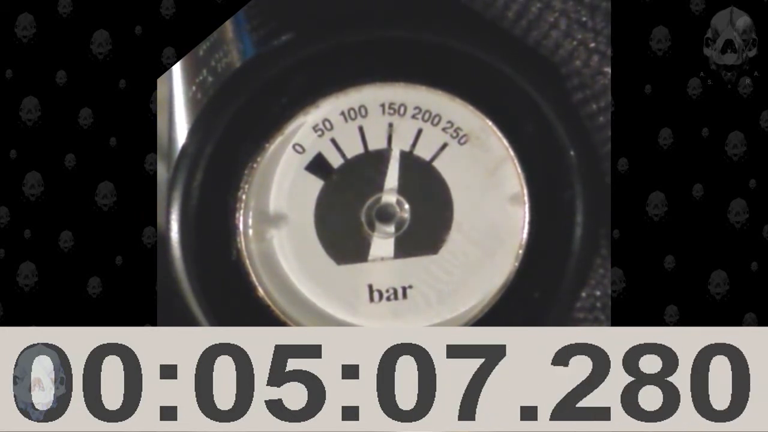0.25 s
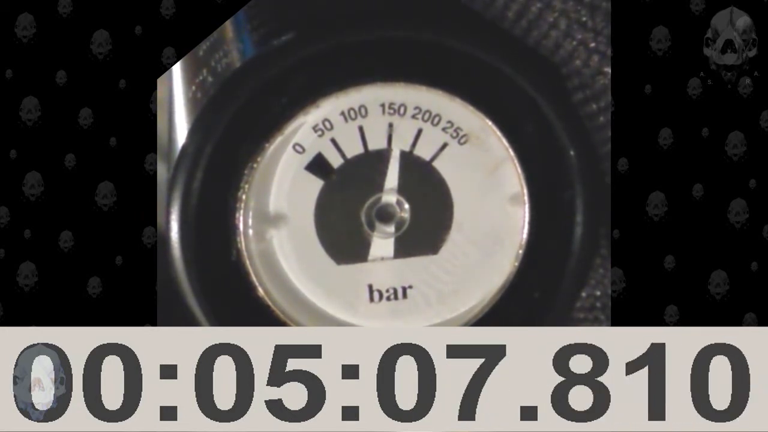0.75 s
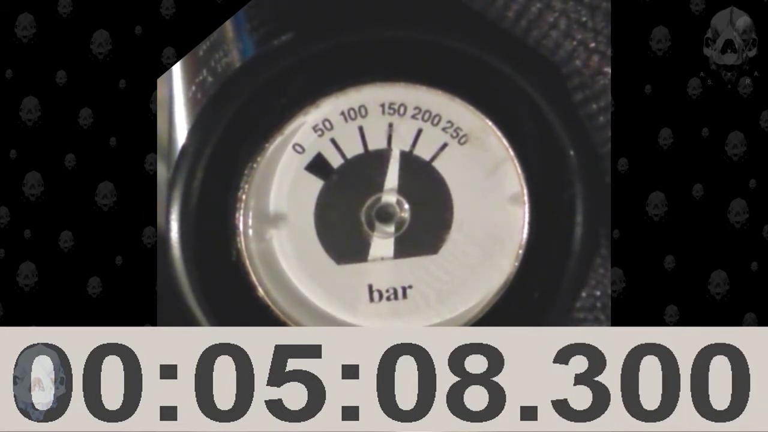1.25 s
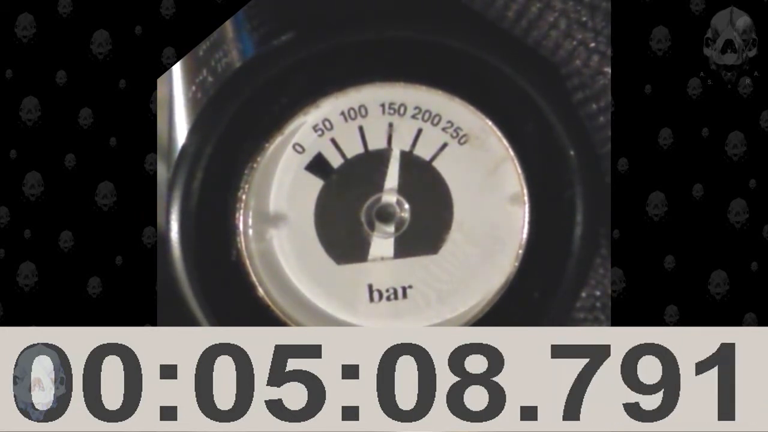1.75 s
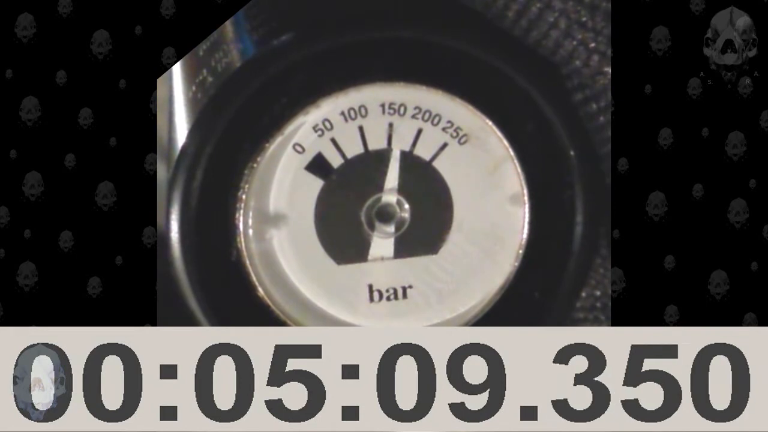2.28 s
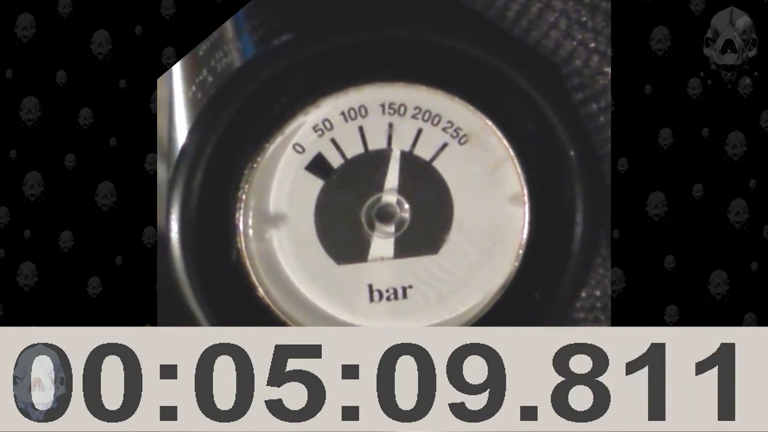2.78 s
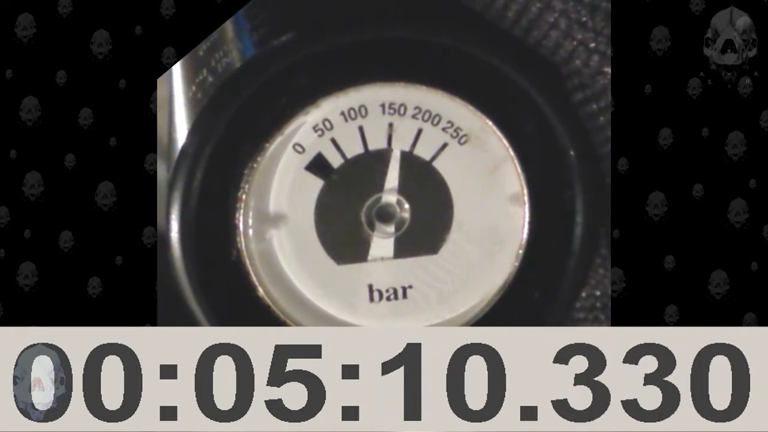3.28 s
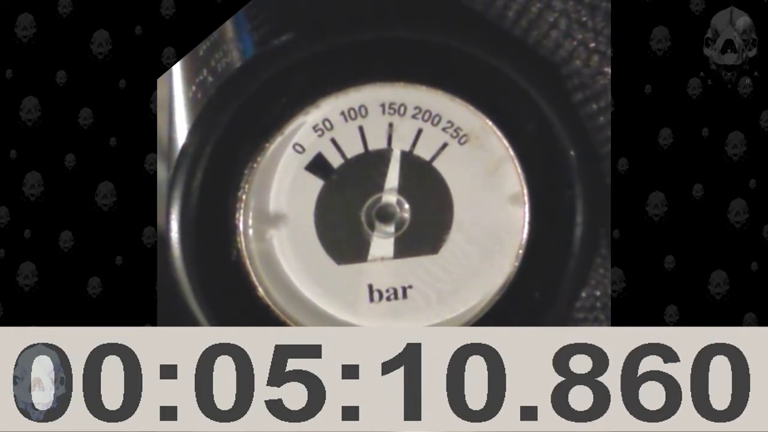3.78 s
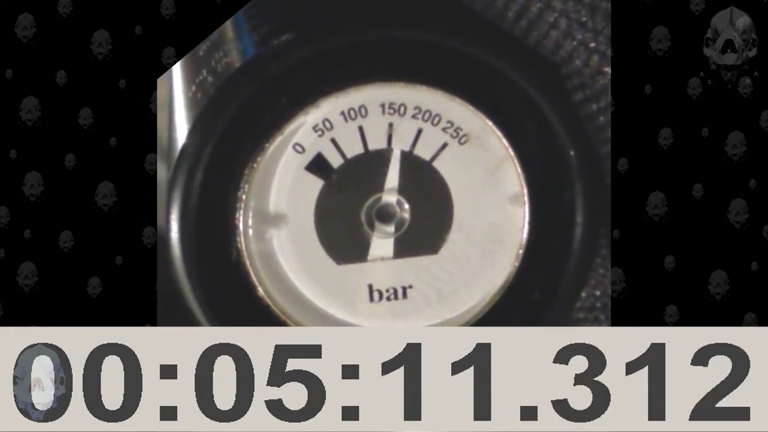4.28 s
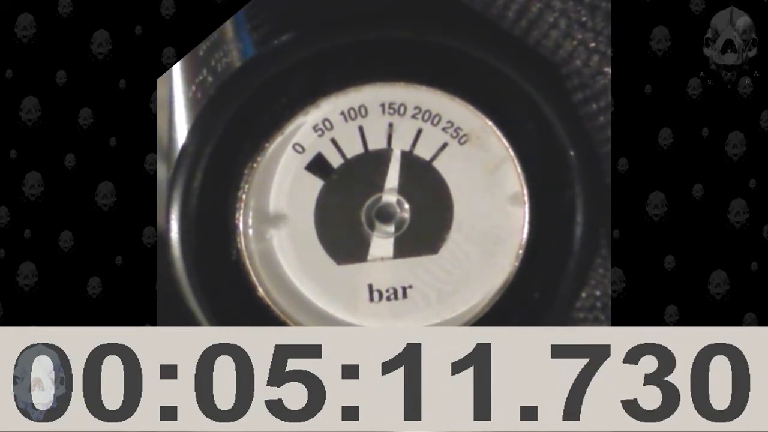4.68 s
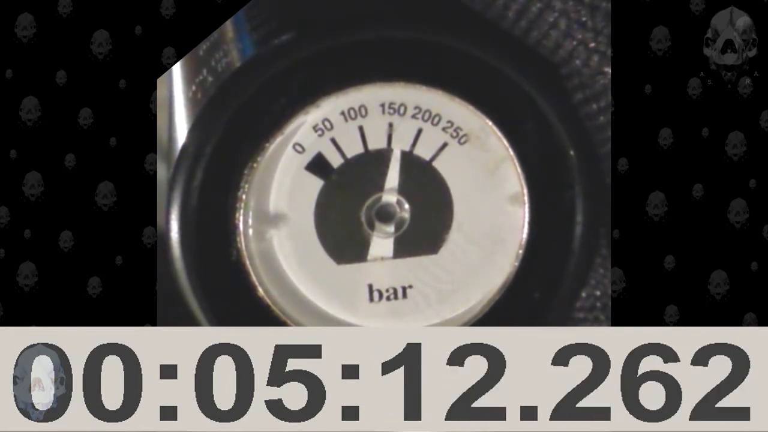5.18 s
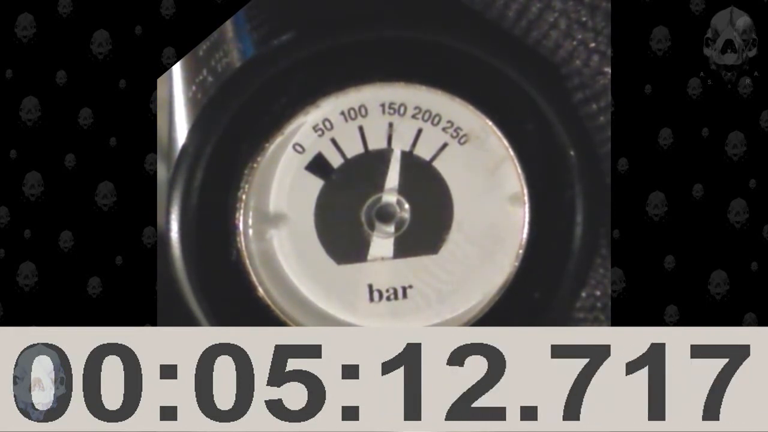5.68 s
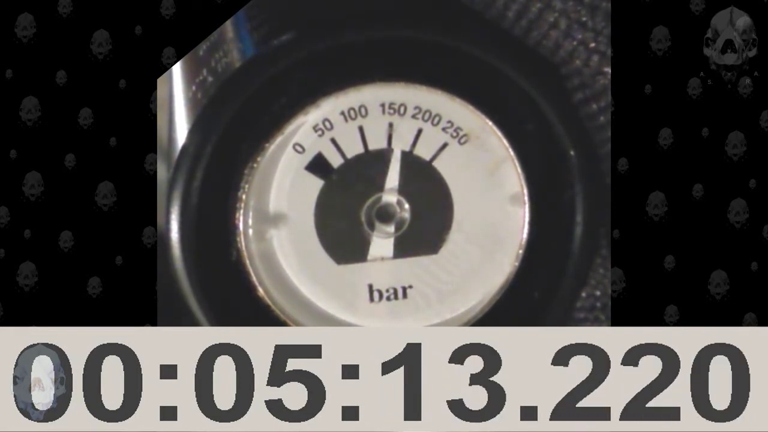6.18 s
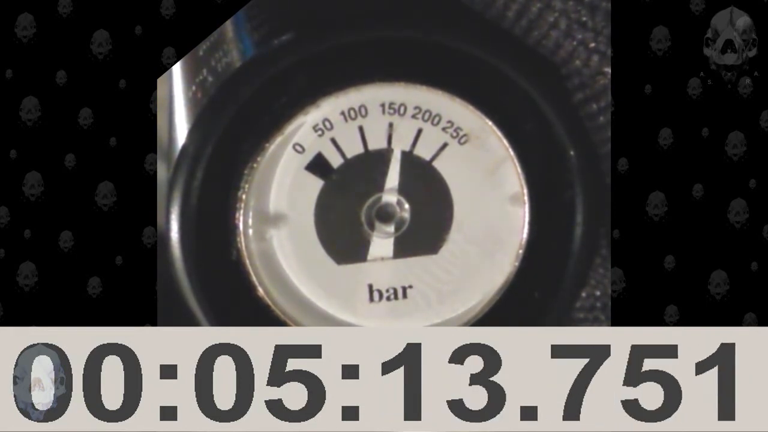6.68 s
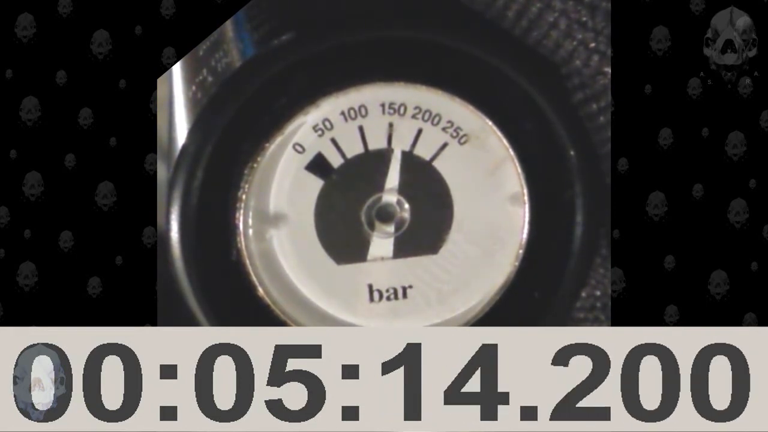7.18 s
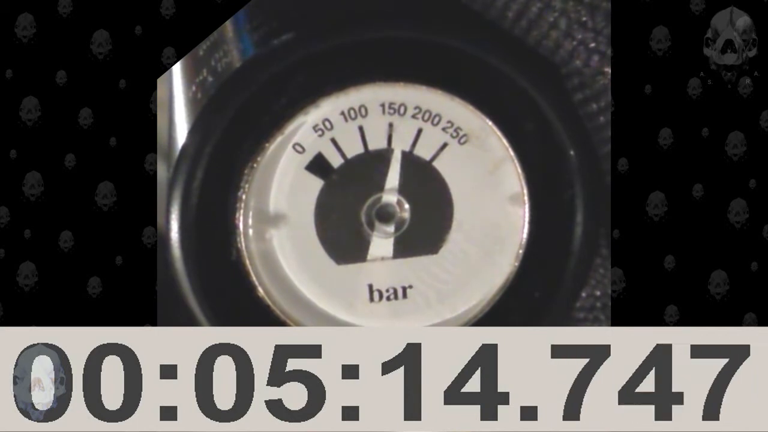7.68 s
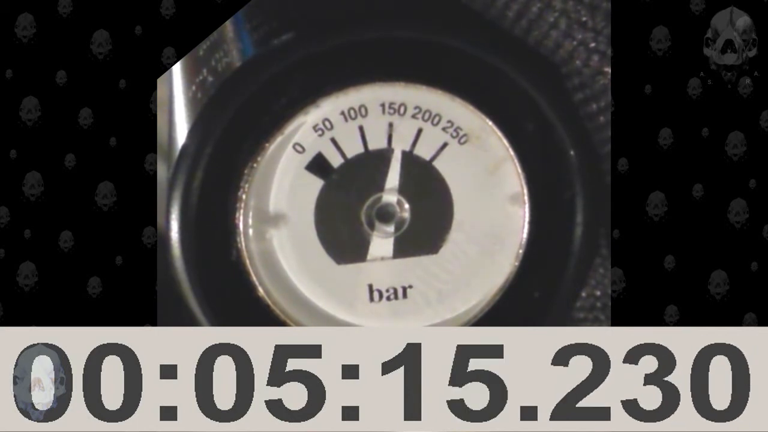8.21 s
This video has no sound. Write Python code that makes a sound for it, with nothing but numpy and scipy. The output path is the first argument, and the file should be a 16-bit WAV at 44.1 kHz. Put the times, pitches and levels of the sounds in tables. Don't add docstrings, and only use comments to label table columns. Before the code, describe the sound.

A small high-pressure piston compressor runs steadily indoors, close to a stereo microphone. Its geared motor drones low and throbs several times per crank turn, with a rattling metal casing and a constant fan and leak hiss. Nearly twice a second, a short air puff and dull thud mark the stroke, often near a bright steel valve click. A loose panel buzzes briefly now and then.

```python
import sys
import numpy as np
from scipy import signal
from scipy.fft import rfft, irfft, next_fast_len
from scipy.io import wavfile
from scipy.ndimage import map_coordinates

SR = 44100
rng = np.random.default_rng(int(sys.argv[2]) if len(sys.argv) > 2 else 0)


def field_ratio(decibels):
    return 10 ** (np.asarray(decibels, dtype=float) / 20)


def generate_wav(signal):
    frames = np.transpose(np.atleast_2d(signal))
    scaled = np.clip(frames, -1, 1) * 32767
    pcm = np.round(scaled).astype(np.int16)
    wavfile.write(sys.argv[1], SR, pcm)


N = 372644
T = np.arange(N) / SR
CRANK_HZ = 1.7437
ANGLE = T * CRANK_HZ % 1

# short_throb_db, long_throb_db, after_throb_db, turnover_throb_db, puff_db
STROKES = [(-0.5, 0.5, 1.5, 2, -25), (-2, -2, -7, 0, -25), (-1.5, 0.5, -5, -9, -25.5),
           (-0.5, 1, -2, 7.5, -24.5), (-1, 1.5, -3, -1, -25), (0.5, 0.5, -3.5, 5.5, -24.5),
           (0, -1, -6, 4.5, -25), (-1.5, 2, -0.5, 0, -25.5), (0.5, 1, -2.5, 6, -23),
           (-1.5, 0.5, 2.5, -8, -26), (-3.5, -1, -1.5, -4.5, -29), (-3, 1.5, 4, -6, -24.5),
           (-0.5, -5, 0, -2, -26.5), (-1.5, 1, -1, -4, -23.5), (-2, 2.5, -1, 4, -24)]


def unit(x):
    return x / np.sqrt(np.mean(x ** 2) + 1e-20)


def along(points, hz):
    f, v = np.transpose(points)
    return np.interp(np.log(hz + 1), np.log(f + 1), v)


def wobble(rate):
    coarse = T[::32]
    knots = rng.standard_normal(2000)
    return np.interp(T, coarse, map_coordinates(knots, [coarse * min(rate, 200)]))


def from_angle(centre):
    return (ANGLE - centre + .5) % 1 - .5


def swell(centre, rise, fall):
    d = from_angle(centre)
    return np.exp(-(d / np.where(d < 0, rise, fall)) ** 2)


def per_turn(values, centre):
    turn = np.round(T * CRANK_HZ - centre).astype(int)
    return np.asarray(values)[np.clip(turn, 0, len(values) - 1)]


def throbs(swells, rest_db, more_db=()):
    gain = field_ratio(rest_db)
    for centre, rise, fall, db in swells[len(more_db):]:
        gain = gain + field_ratio(db) * swell(centre, rise, fall)
    for (centre, rise, fall, db), more in zip(swells, more_db):
        gain = gain + field_ratio(db + per_turn(more, centre)) * swell(centre, rise, fall)
    return gain


def filtered(x, response):
    m = next_fast_len(N + 8192)
    return irfft(rfft(x, m) * response(np.fft.rfftfreq(m, 1 / SR)), m)[..., :N]


def spread(pair):
    # frequency_hz, likeness (0-1)
    alike = [(60, .98), (125, .8), (200, .99), (420, .95), (520, .8), (630, .9), (740, .45), (840, .88),
             (1020, .4), (1250, .72), (1800, .5), (2400, .4), (2930, .8), (4000, .4), (15000, .35)]

    def mid_and_side(hz):
        half_angle = np.arccos(np.clip(along(alike, hz), -1, 1)) / 2
        return np.array([np.cos(half_angle), np.sin(half_angle)])

    mid, side = filtered(pair, mid_and_side)
    return np.array([mid + side, mid - side])


def rush(spectrum, modes, grain_db, repeats=((100, 0),)):
    fresh, once = rng.standard_normal((2, 2, N)) * field_ratio(grain_db * wobble(150))
    again = once[:, (ANGLE * SR / CRANK_HZ).astype(int)]
    noise = filtered(fresh, lambda f: np.sqrt(1 - along(repeats, f)))
    noise += filtered(again, lambda f: np.sqrt(along(repeats, f)))

    def resonant(f):
        power = 1 + sum(field_ratio(db) ** 2 / (1 + (2 * (f - c) / w) ** 2) for c, w, db in modes)
        return field_ratio(along(spectrum, f)) * np.sqrt(power)

    return unit(spread(filtered(noise, resonant)))


def tones(lines, bend, flutter_db):
    pair = np.zeros((2, N))
    for hz, db, blur_hz in lines:
        for port, stray_hz in zip(pair, (0, 6)):
            slip = np.cumsum(hz * bend + (blur_hz + stray_hz) * wobble(25)) / SR
            phase = 2 * np.pi * (hz * T + slip + rng.random())
            port += field_ratio(db + flutter_db * wobble(30)) * np.sin(phase)
    return unit(spread(pair))


def geared(lines):
    return [(round(hz / CRANK_HZ) * CRANK_HZ, db, blur_hz) for hz, db, blur_hz in lines]


def tooth_blows():
    teeth = 17
    tooth = teeth * ANGLE - .4
    uneven = np.interp(tooth, np.arange(teeth), rng.standard_normal(teeth), period=teeth)
    return np.cos(2 * np.pi * tooth) + 1.5 * uneven


def tooth_drone():
    # frequency_hz, level_db, blur_hz
    thump_lines = [(64.52, 0, .02), (161, -9.5, 0.1)]
    drone_lines = [(221.45, 0, 0.1), (230.17, -17, 0.1)]
    # angle_turns, rise_turns, fall_turns, level_db
    thump_swells = [(.06, 0.082, .1, -35.5), (.25, .08, .15, -44), (.66, 0.19, 0.19, -38)]
    drone_swells = [(0.175, 0.038, 0.027, -15), (0.593, 0.069, 0.068, -15.5), (0.752, 0.061, 0.07, -21),
                    (0.02, 0.051, 0.046, -24), (0.508, 0.01, 0.029, -19), (0.3, 0.072, 0.095, -25)]
    mesh_swells = [(0.29, 0.18, 0.15, -30.5), (0.707, 0.082, 0.036, -25.5), (0.786, 0.052, 0.094, -36.5),
                   (0.5, .03, 0.047, -39)]
    *more_drone_db, _ = np.transpose(STROKES)
    drone = throbs(drone_swells, -34, more_drone_db)
    bend = 0.0048 * drone / drone.max() + 0.057 * swell(0.98, 0.047, 0.047)
    low = throbs(thump_swells, -48.5) * tones(thump_lines, 0, flutter_db=1.6)
    low += drone * tones(drone_lines, bend - bend.mean(), flutter_db=1.8)
    low += throbs(mesh_swells, -54.5) * tones([(189.3, 0, 0.1)], 0, flutter_db=-0.5)
    return low


def cover(gear_load, tooth_db):
    # frequency_hz, level_db, blur_hz
    lower_lines = [(782, -0.73, 4.6), (806.6, -0.19, 3.74)]
    upper_lines = [(835, -3.5, 3.82), (866, -6, 5.06), (1009, -14.5, 10.5)]
    climb_db = 5 * (swell(0.79, 0.12, 0.03) + swell(.3, .1, .05)
                    - swell(0.53, 0.06, 0.07) - .6 * swell(.05, .1, .08))
    arch = .012 * (swell(0.811, .25, 0.0415) + swell(0.268, 0.1178, 0.0503))
    gain = field_ratio(-31 + 0.75 * tooth_db) * (gear_load / field_ratio(-20.5)) ** 0.077
    lower = gain * field_ratio(-climb_db) * tones(lower_lines, arch, flutter_db=2.0)
    return lower + gain * field_ratio(climb_db) * tones(upper_lines, arch, flutter_db=2.0)


def slack_knock():
    # frequency_hz, level_db (per Hz)
    knock_spectrum = [(350, -34), (520, -3), (650, 1), (900, -9), (1400, -30), (3000, -80)]
    knock = rush(knock_spectrum, [], grain_db=-1.5, repeats=[(100, 0.36)])
    return field_ratio(-20.5) * swell(0.271, .008, 0.018) * knock


def casing_rattle(tooth_db):
    # frequency_hz, level_db (per Hz)
    rattle_spectrum = [(35, -32), (60, -29), (147, -21), (226, -5), (303, -15), (382, -15.5), (467, -12.5),
                       (537, -18), (627, -6.5), (720, -10.5), (815, -7), (965, -20.5), (1160, -14.5),
                       (1710, -22.5), (2400, -25.5), (3120, -52), (5280, -120)]
    # frequency_hz, width_hz, level_db (over the noise)
    casing_modes = [(1156, 71, 8.5), (1464, 12.5, 8.5), (1280, 130, 2)]
    # frequency_hz, share (0-1)
    rattle_repeats = [(150, .7), (350, .55), (500, .3), (750, .1), (1300, .08), (1800, 0)]
    # angle_turns, rise_turns, fall_turns, level_db
    rattle_swells = [(.2, 0.083, 0.14, -31.5), (.55, 0.064, 0.06, -30), (.7, 0.086, 0.1, -29),
                     (.95, .1, 0.11, -31)]
    load = (throbs(rattle_swells, -30) / field_ratio(-28.5)) ** 1.25
    gain = load * field_ratio(-27.0 + tooth_db + 0.58 * wobble(18))
    return gain * rush(rattle_spectrum, casing_modes, grain_db=1.5, repeats=rattle_repeats)


def gears():
    # frequency_hz, level_db, blur_hz
    gear_lines = [(248.2, 0.5, 0.56), (285.4, -6, 0.61), (318.5, -19, 0.47), (343, -6, 0.33),
                  (438.4, -9, 1.1), (471, -5, 1.35), (608, -9, 3.1), (621.5, -5.5, 2.8),
                  (647.5, -9.5, 3.88), (722, -7.5, 7.8)]
    # angle_turns, rise_turns, fall_turns, level_db
    gear_swells = [(.22, 0.069, 0.11, -24.5), (.6, 0.1, 0.14, -24.5), (.8, 0.078, 0.079, -24),
                   (.97, 0.04, 0.049, -26.5)]
    gear_load = throbs(gear_swells, -35.5)
    tooth_db = tooth_blows()
    high = field_ratio(-30.5) * (gear_load / field_ratio(-25.5)) ** 1.1 * tones(geared(gear_lines), 0, flutter_db=1.85)
    high += cover(gear_load, tooth_db) + slack_knock() + casing_rattle(tooth_db)
    return tooth_drone() + field_ratio(.45 * wobble(10)) * high


def motor():
    # angle_turns, rise_turns, fall_turns, level_db
    hum_swells = [(.08, .08, 0.054, -38), (.27, 0.08, 0.089, -36), (.6, .1, .2, -52.5)]
    sag = 0.031 * swell(0.21, 0.22, .15)
    return throbs(hum_swells, -44.5) * tones([(120, 0, 0.2)], sag.mean() - sag, flutter_db=1.7)


def air():
    # frequency_hz, level_db (per Hz)
    hiss_spectrum = [(940, -15), (1600, -4.5), (1690, -14), (1830, -4.5), (2170, -14), (2680, -3.5),
                     (2930, -3.5), (4010, -15.5), (6000, -20.5), (7000, -25.5), (9240, -20.5), (9980, -20),
                     (15100, -31.5), (15800, -31)]
    # frequency_hz, width_hz, level_db (over the noise)
    head_modes = [(2490, 31, 2.6), (2890, 49, 5.1), (3500, 20, 2.6), (3696, 63, 2.6), (3254, 120, 1.7),
                  (8470, 230, 5.7), (9040, 74, 13), (9340, 68, 3.3)]
    load = swell(0.22, 0.12, 0.18) + swell(0.64, 0.16, 0.32) + swell(0.96, 0.088, 0.028)
    hiss = rush(hiss_spectrum, head_modes, grain_db=1.0)
    fizz = filtered(hiss, lambda f: 1 / (1 + (3900 / (f + 1)) ** 8))
    fizz_db = 1.07 + 0.48 * wobble(8) + 3.14 * load + 0.59 * wobble(30) + 0.27 * wobble(70)
    hiss = field_ratio(-29.5 + 2.4 * load + 0.93 * wobble(14)) * (hiss - fizz) + field_ratio(-33.0 + fizz_db) * fizz
    sing_db = -43 + 15 * swell(0.98, 0.11, 0.07) + 2.5 * wobble(6.5)
    sing = field_ratio(sing_db) * tones([(2935, 0, 8)], 0, flutter_db=1.5)
    reed_spectrum = [(12000, -40), (13800, -8), (14600, 0), (15600, -6), (17000, -40)]
    reed = field_ratio(-51) * swell(0.59, .04, .06) * rush(reed_spectrum, [], grain_db=0.0)
    return hiss + sing + reed


def bearings():
    # angle_turns, length_turns, level_db, pitch_hz
    jolts = [
        (.088, .03, -28, 78),
        (.215, .016, -23, 282),
    ]
    shudder = field_ratio(-41) * (.3 + swell(.6, .1, .14)) * tones([(90.67, 0, .05)], 0, flutter_db=.8)
    out = shudder
    for centre, length, db, hz in jolts:
        ring = np.cos(2 * np.pi * hz * from_angle(centre) / CRANK_HZ)
        out = out + field_ratio(db + 0.9 * wobble(2.83)) * swell(centre, length, length) * ring
    return out


def valve_clicks():
    # start_s, peak_db, low_part_db
    click_events = [(0.543, -31, -6), (1.063, -30, -6), (1.692, -20.5, 2), (2.2308, -24, -4),
                    (2.501, -25.5, 9), (2.7861, -25, -6), (2.838, -19, 0.5), (3.074, -29, -6),
                    (3.3777, -31, -6), (3.952, -23, -6), (4.5037, -37, -6), (4.56, -16, -9),
                    (5.0779, -48.5, -6), (5.0983, -26, -6), (5.133, -28, -6), (5.3667, -27, -6),
                    (5.7049, -30, -6), (5.941, -27, 1), (6.5145, -26, 9), (7.3935, -25, -6),
                    (7.9992, -24, -4)]
    bright, dull = np.zeros((2, 2, N + SR))
    t = np.arange(2000) / SR
    decay = field_ratio(-60 * t / 0.022) + 0.36 * field_ratio(-60 * t / 0.044)
    for start_s, db, low_db in click_events:
        burst = decay * rng.standard_normal((2, len(t)))
        span = slice(round(start_s * SR), round(start_s * SR) + len(t))
        bright[:, span] += field_ratio(db - 2) * burst
        dull[:, span] += field_ratio(db + low_db) * burst
    steel = [(2500, -30), (4500, 8), (7000, -7.0), (9500, 8), (12000, -7), (16000, -14)]
    body = [(300, -42), (1000, 4), (3000, 7), (5000, -40)]
    clicks = filtered(bright[:, :N], lambda f: field_ratio(along(steel, f)))
    return clicks + filtered(dull[:, :N], lambda f: field_ratio(along(body, f)))


def valve():
    # frequency_hz, level_db (per Hz)
    puff_spectrum = [(900, -33), (1300, 1), (1500, 3), (2000, 9), (3000, -7), (5000, -9), (9000, -40),
                     (16000, -48)]
    puff_gain = field_ratio(per_turn(np.transpose(STROKES)[-1], .93)) * swell(0.943, .09, 0.086)
    puff = puff_gain * rush(puff_spectrum, [(1428, 180, 10.7)], grain_db=4.0)
    since = (ANGLE - .9) % 1 / CRANK_HZ
    thud_phase = 2 * np.pi * (240 * since - 2.4 * np.exp(-since / 0.022))
    thud = field_ratio(-17) * swell(.925, .014, 0.035) * np.sin(thud_phase)
    return puff + thud + valve_clicks()


def panel():
    # centre_s, level_db, pitch_hz
    buzzes = [
        (2.4, -25, 290),
        (3.791, -22, 310),
        (6.68, -24, 291),
        (7.211, -19.5, 285),
    ]
    out = 0
    for centre_s, db, hz in buzzes:
        envelope = np.exp(-((T - centre_s) / 0.033) ** 2)
        out = out + field_ratio(db) * envelope * tones([(hz, 0, 9)], 0, flutter_db=6.5)
    return out


def scene():
    return gears() + motor() + air() + bearings() + valve() + panel()


def roll_off(x):
    return signal.sosfilt(signal.butter(12, 16550, fs=SR, output="sos"), x)


def record(dry):
    # frequency_hz, level_db
    lean = [(60, -1.2), (110, 0), (200, -1.6), (380, -2.5), (700, -1.5), (1290, -5), (2380, 2.5),
            (4400, -1), (8120, 1.7), (15000, 0)]
    # frequency_hz, lead_rad
    port_lead = [(60, .2), (125, -.4), (200, .2), (560, .3), (900, 1.2), (1080, 1.5), (1300, -.6),
                 (1470, 0), (1720, -2.4), (2050, -2.9), (2430, -6.5), (2690, -8.5), (2930, -6.9),
                 (3200, -6.3)]
    steps = rng.standard_normal((3, 200))
    knots_hz = 3200 + 70 * np.arange(200)
    scramble = .9 * (np.cumsum(steps[0]) - steps[0, 0])

    def port_response(f):
        lead = along(port_lead, f) + np.interp(f, knots_hz, scramble)
        ripple_db = 1.8 * np.array([np.interp(f, knots_hz, r, left=0) for r in steps[1:]])
        band = (f < 15830) / np.sqrt(1 + (50 / (f + 1)) ** 7)
        colour = band * field_ratio(np.outer([.5, -.5], along(lean, f)) + ripple_db)
        return colour * np.exp(np.outer([-.5j, .5j], lead))

    return roll_off(filtered(dry, port_response))


dry = scene()
out = record(dry)
generate_wav(out)
```